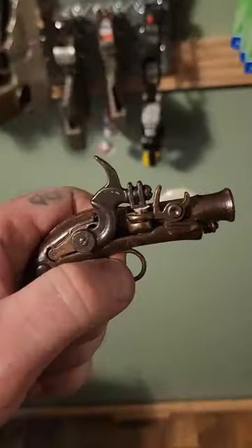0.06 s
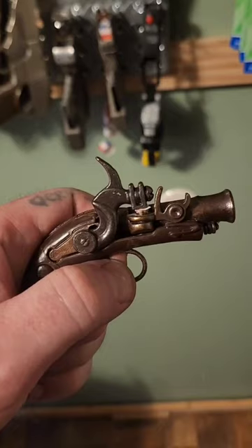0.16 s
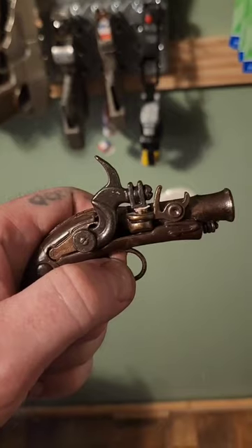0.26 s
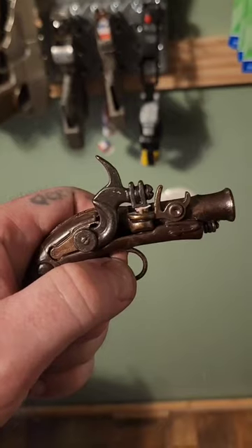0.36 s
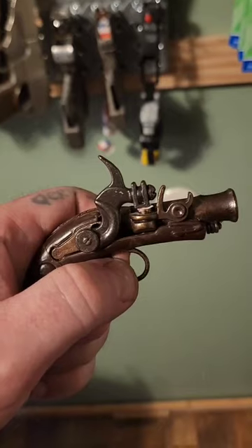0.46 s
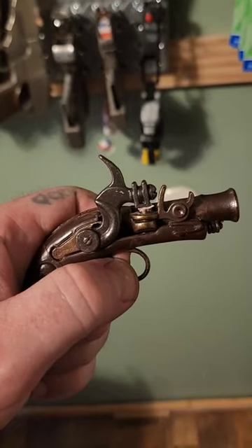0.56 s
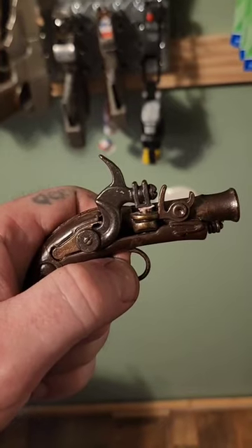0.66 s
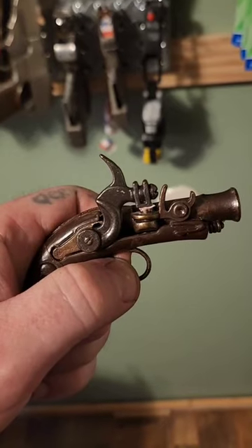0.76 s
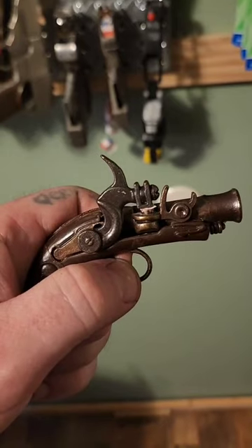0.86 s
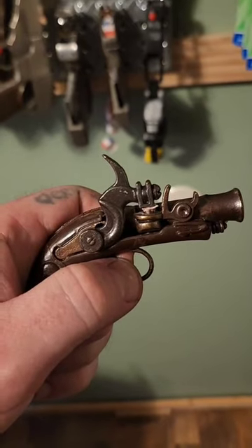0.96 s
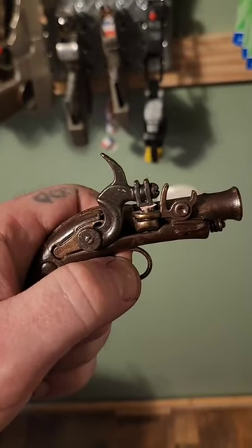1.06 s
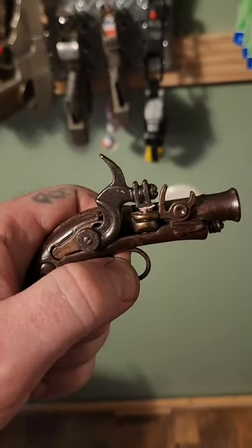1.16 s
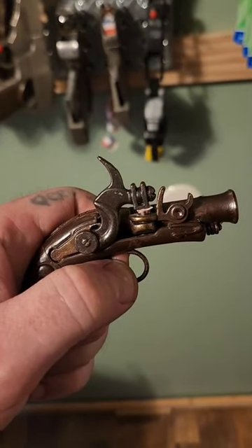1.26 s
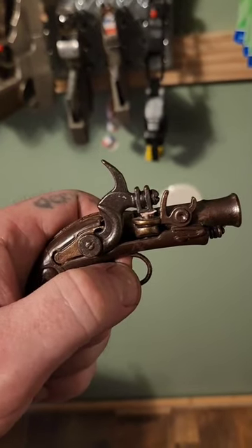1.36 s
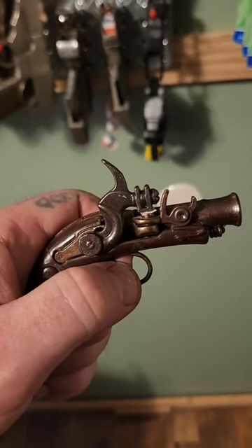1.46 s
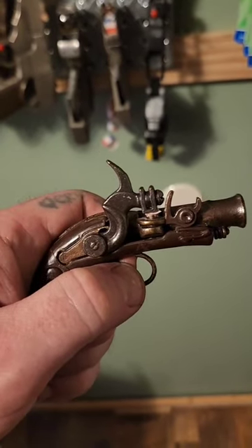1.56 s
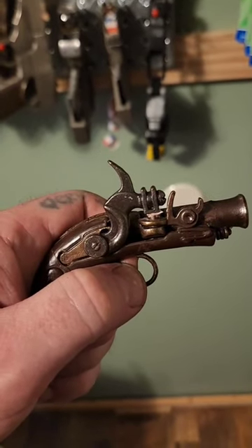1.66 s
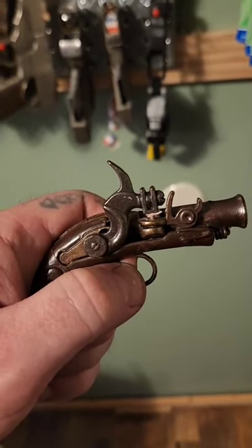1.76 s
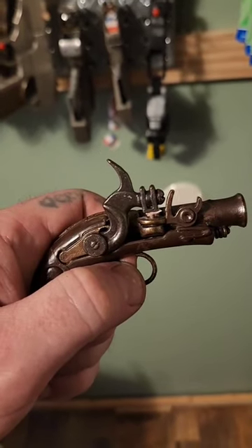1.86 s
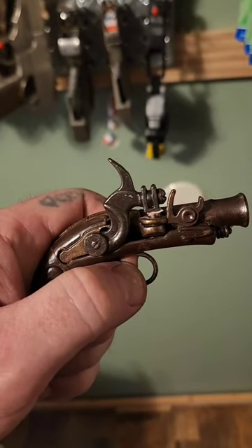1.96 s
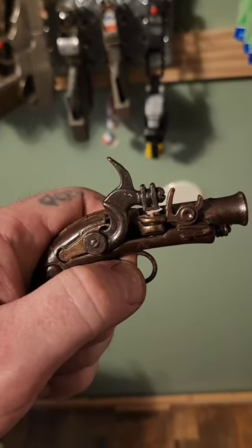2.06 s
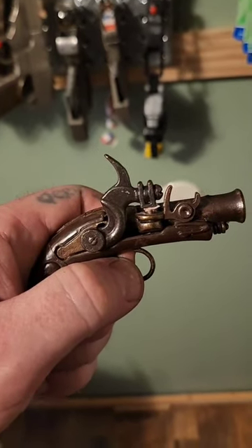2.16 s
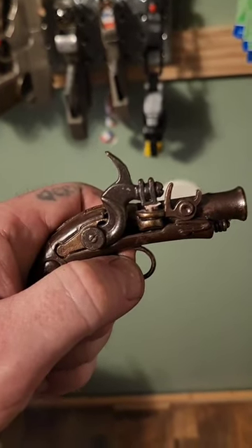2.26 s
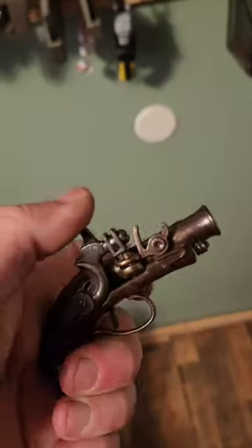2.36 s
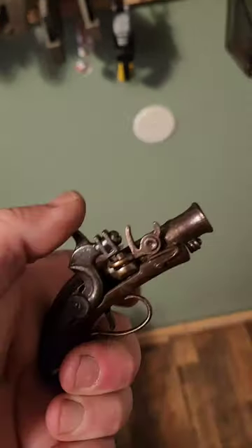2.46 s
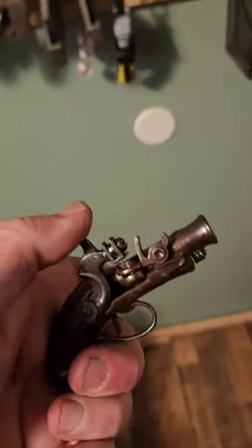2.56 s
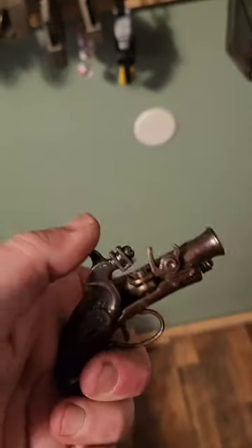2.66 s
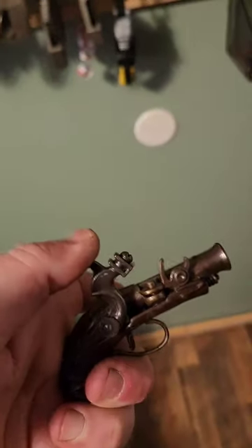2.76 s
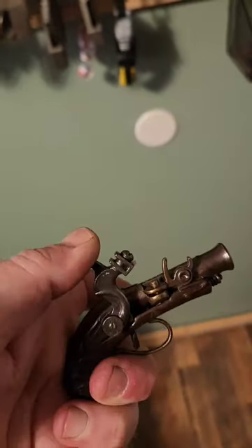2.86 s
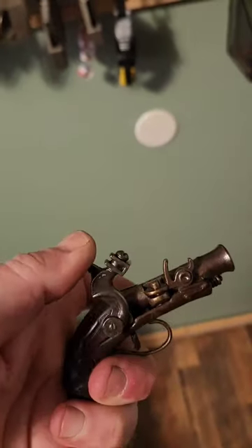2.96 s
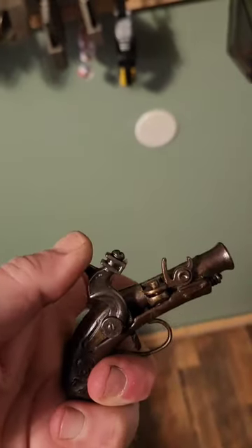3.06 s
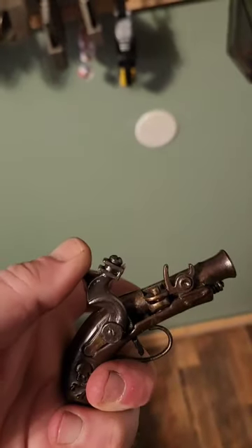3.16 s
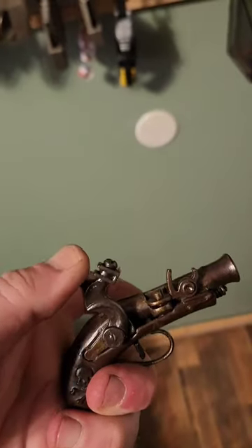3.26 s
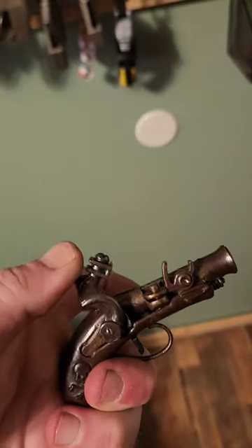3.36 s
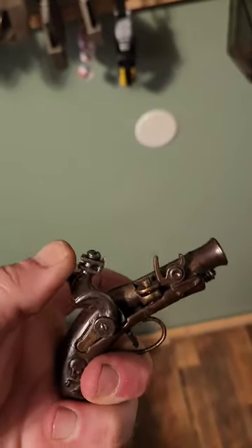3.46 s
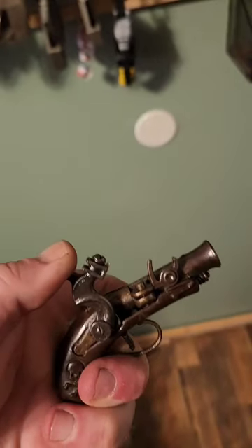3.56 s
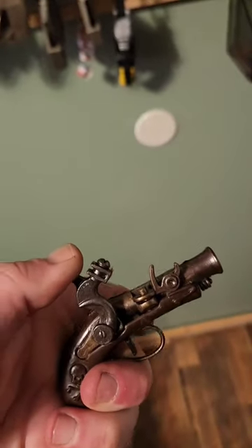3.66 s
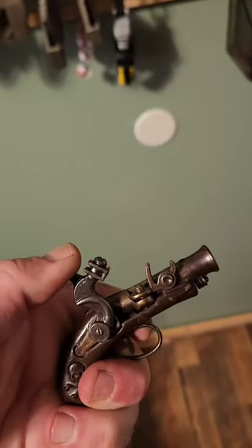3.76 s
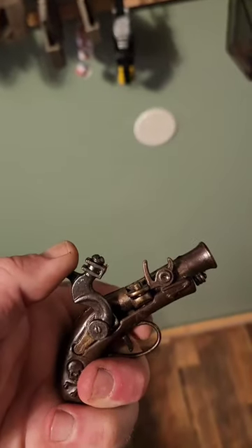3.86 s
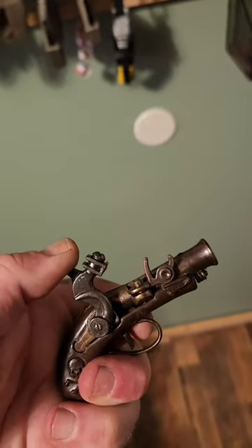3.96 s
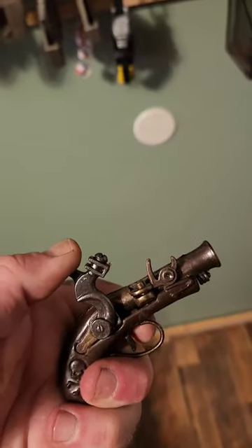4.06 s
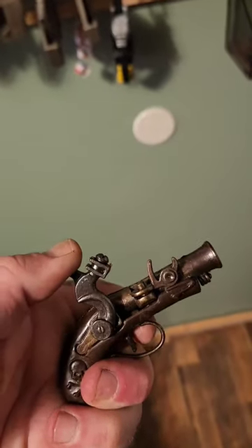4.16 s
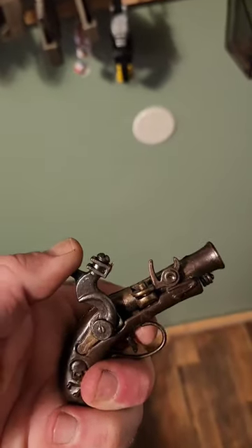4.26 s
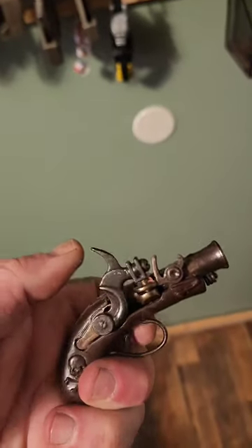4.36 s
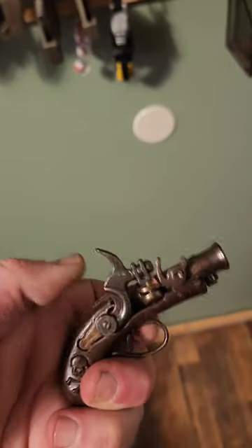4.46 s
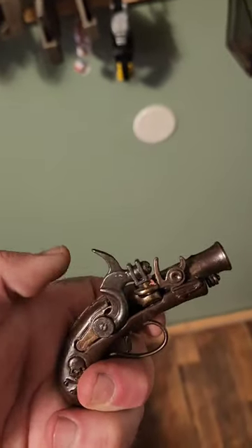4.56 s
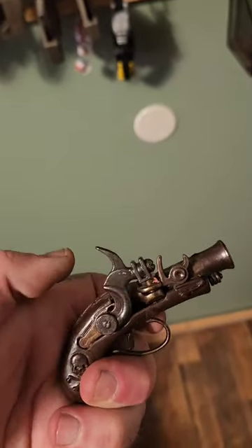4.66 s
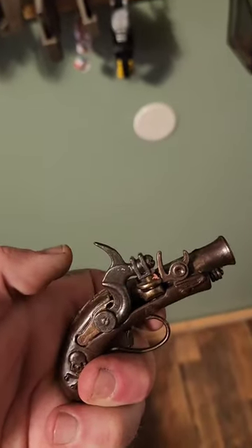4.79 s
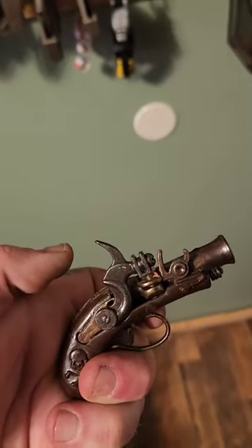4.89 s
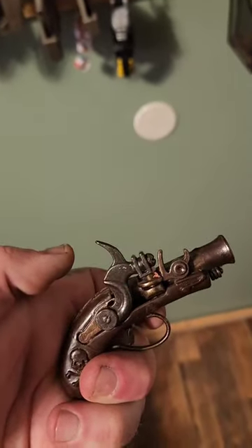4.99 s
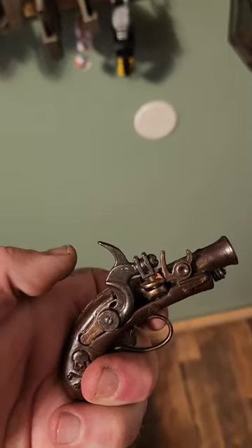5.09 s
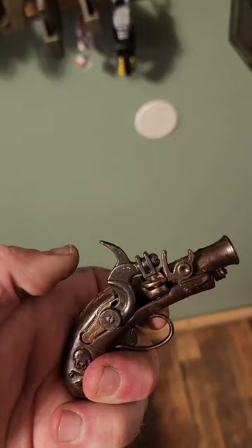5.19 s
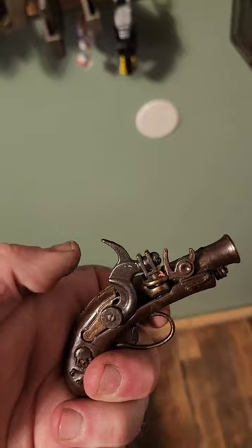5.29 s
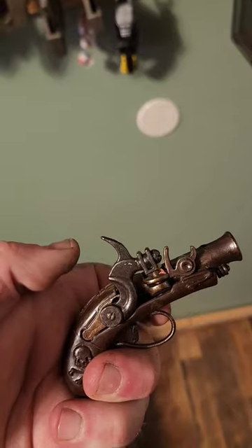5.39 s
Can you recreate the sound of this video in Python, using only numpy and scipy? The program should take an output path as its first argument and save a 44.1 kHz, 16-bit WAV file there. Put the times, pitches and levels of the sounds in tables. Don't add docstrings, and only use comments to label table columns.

```python
import sys
import numpy as np
from scipy import signal
from scipy.fft import rfft, irfft
from scipy.io import wavfile

SR = 44100
rng = np.random.default_rng(int(sys.argv[2]) if len(sys.argv) > 2 else 0)


def volts(x):
    e = np.asarray(x, float) / 20
    return 10 ** e


def digitize_waveform(pressure):
    field = np.atleast_2d(pressure).T
    bounded = np.clip(field, -1, 1)
    quanta = np.round(bounded * 32767).astype(np.int16)
    wavfile.write(sys.argv[1], SR, quanta)


N = 239440
TOP_HZ = 15650


def rms_one(x):
    return x / np.sqrt(np.mean(x ** 2) + 1e-20)


def cut(x, hz, kind, order):
    return signal.sosfilt(signal.butter(order, hz, kind, fs=SR, output="sos"), x)


def ramp(s, length):
    return np.clip((np.arange(N) / SR - s) / max(length, 1e-4), 0, 1)


def ring(x, hz, t60):
    r, w = volts(-60 / (t60 * SR)), 2 * np.pi * hz / SR
    return signal.lfilter([0, np.sin(w)], [1, -2 * r * np.cos(w), r * r], x + 1e-18)


def at_hz(points, hz, index=1):
    points = np.array(points)
    return np.interp(np.log(hz), np.log(points[:, 0]), points[:, index])


# (pitch [Hz], likeness [0 to 1])
LIKENESS = [(60, 0.99), (130, .7), (290, 0.37), (640, 0.07), (1400, 0.01)]


def coloured(spectrum, size, ripple_db, ripple_hz):
    hz = np.maximum(np.fft.rfftfreq(size, 1 / SR), 1)
    mid, side = rfft(rng.standard_normal((2, size)))
    alike = np.clip(at_hz(LIKENESS, hz), 0, 1)
    lines = np.sqrt(1 + alike) * mid + np.sqrt(1 - alike) * side * [[1], [-1]]
    colour_db = [at_hz(spectrum, hz, index=1), at_hz(spectrum, hz, index=2)]
    lines = lines * volts(colour_db) * (hz > 15) * (hz < TOP_HZ)
    knots = rng.standard_normal((2, 400))
    lines = lines * volts([ripple_db * np.interp(hz / ripple_hz, np.arange(400), k) for k in knots])
    return hz, lines / np.std(irfft(lines.mean(axis=0), size))


# (start [s], end [s],
# rumble [dB], hiss [dB], creep of the hiss [dB])
HIGH_STRETCHES = [
    (0, .2075, -68.5, -69.5, 10),
    (.262, 2.596, -65.5, -77, 8),
    (4.595, 5.43, -67, -74, 2),
]
LOW_STRETCHES = [
    (2.651, 4.52, -57, -64.5, -7.5),
]


def stretch_levels(stretches):
    t = np.arange(N) / SR
    start, end, rumble_db, hiss_db, creep_db = np.transpose(stretches)[:, :, None]
    away = np.maximum(np.maximum(start - t, t - end), 0)
    near = away.argmin(axis=0)
    creep_s, rumble_follows = 0.95, 0.18
    creep = np.choose(near, creep_db * (1 - np.exp(-np.maximum(t - start, 0) / creep_s)))
    away = away.min(axis=0)
    step_db, step_s, slide_db_per_s = -21, .003, -450
    gate = np.maximum(step_db * np.minimum(away / step_s, 1) + slide_db_per_s * away, -100)
    return gate, (rumble_db[near, 0] + rumble_follows * creep, hiss_db[near, 0] + creep)


# (pitch [Hz], left level [dB per Hz], right level [dB per Hz])
TONE_HIGH = [(21.5, -11, -10.5), (44, -1, -2.5), (65.5, 1.5, 1), (110, -20, -16), (246, -23, -19),
             (500, -20.5, -21), (1305, -30, -20), (3180, -37.5, -26.5), (5600, -42, -30),
             (7500, -38.5, -40), (9500, -44, -45.5), (12500, -38.5, -33), (14500, -38.5, -38.5),
             (15700, -45.5, -43.5)]
TONE_LOW = [(22, -9, -10), (45, 2, 2), (69, -3.5, -3.5), (122, -20, -24.5), (201, -17.5, -18.5),
            (324, -26, -28), (450, -22, -19), (970, -26.5, -32.5), (2530, -33.5, -34), (4940, -40, -44),
            (7500, -42.5, -49.5), (9300, -52, -52), (12700, -40, -57.5), (15700, -52, -62)]
# (pitch [Hz], width [Hz], level over the room sound [dB])
HUMS = [(60, 12, 3.5), (158.6, 8.3, 3.5), (226, 21, 6.5), (392, 33, 5.5), (445.4, 22, 4.5), (503, 18, 9.5),
        (743, 16, 3.5)]


def room_tone(spectrum, levels, split_hz):
    hz, lines = coloured(spectrum, N, ripple_db=1.5, ripple_hz=60.6)
    for hum_hz, width_hz, db in HUMS:
        lines = lines * (1 + (volts(db) - 1) / (1 + (2 * (hz - hum_hz) / width_hz) ** 2))
    low_share = 1 / (1 + (hz / split_hz) ** 4)
    out = 0
    for db, share in zip(levels, (low_share, 1 - low_share)):
        part = irfft(lines * np.sqrt(share), N)
        out = out + volts(db) * part / np.std(part.mean(axis=0))
    return out


# (time [s], hammer level [dB], sear over hammer [dB], left minus right [dB])
CLICKS = [(0.181, -63, 0.5, -12), (2.65, -52, -1, -10), (2.6597, -50, -3.5, -14.5), (2.6741, -47, -5.5, -8),
          (2.6819, -51, 1.5, -8), (2.6927, -54, -10, -7), (2.7054, -54, -7, -7), (2.7167, -53.5, -15, -16),
          (2.7408, -61, 4, 6), (2.7549, -47.5, 2, -8), (2.801, -42.5, -6.5, -6), (2.8141, -44.5, 0.3, -5),
          (2.8529, -63, -3, -11), (2.862, -58, -2.5, -2), (2.8814, -66, -1, 3), (2.8894, -64, -2.5, -4),
          (3.1674, -67, -13, 4.5), (3.7402, -49.5, 3.5, -2), (3.7816, -53.5, -11.5, -13)]
# (time [s], hammer level [dB], sear over hammer [dB], spring over hammer [dB], rattle [s])
LATCH = [
    (3.11, -27.5, -2.5, -13, 0.00022),
    (3.128, -56, 5.5, 4.5, .0006),
    (3.2821, -38.5, -3.5, -3, 0.00086),
    (3.293, -60, 8.5, 5, 0.00089),
    (3.8369, -41, -3.5, -18, 0.00058),
]
# (pitch [Hz], level [dB], time to fade 60 dB [s])
LOCK_MODES = [
    [(2200, -7, .004), (2650, -1, 0.007), (3050, 3, 0.0065), (3500, 1, 0.0053), (3943, -4, 0.0019)],
    [(5450, -0.5, .004), (6390, 1.5, .006), (7500, -10, .003), (8500, -15, .003), (9400, -12, .004)],
    [(10200, -6, .003), (11850, -0.5, 0.0031), (12900, -3, .003), (14400, -4, .003)],
]
# (start time [s], length [s], pitch [Hz], level [dB])
RUBS = [(2.716, 0.012, 3700, -54), (2.716, 0.007, 3120, -58), (2.717, 0.017, 6770, -58),
        (2.717, .008, 5100, -64), (2.808, 0.004, 3500, -57.5), (3.128, 0.02, 2634, -64.5),
        (3.277, 0.0055, 7500, -62), (3.282, 0.014, 9130, -59), (3.283, .02, 11500, -63),
        (3.284, .012, 10600, -62), (3.743, 0.0047, 6500, -57), (3.745, 0.055, 6510, -73),
        (3.837, 0.0086, 9300, -65.5), (3.923, 0.025, 6130, -70), (3.924, 0.032, 7040, -76)]


def lock():
    # spring 17 dB under the sear, 0.6 ms rattle; a latch leans to the right
    contacts = [(s, db, sear_db, sear_db - 17, .0006, lean_db) for s, db, sear_db, lean_db in CLICKS]
    contacts += [(*row, -2.5) for row in LATCH]
    rattles = rng.standard_normal((len(contacts), 2, 400))
    echoes = rng.standard_normal((len(contacts), 2, 6000))
    t, out = np.arange(6000) / SR, np.zeros((2, N))
    table_and_wall = volts(-31.0) * np.exp(-t / 0.01)
    whole_room = volts(-41.5) * np.exp(-t / 0.043)
    dying = (table_and_wall + whole_room) * (t > .002)
    for (s, db, sear_db, spring_db, length, lean_db), rattle, echo in zip(contacts, rattles, echoes):
        age = t[:400] / max(length, 1e-4)
        push = np.pad((rattle[0] + rattle) * age * np.exp(-age), ((0, 0), (0, 1100)))
        direct = 0
        for modes, part_db in zip(LOCK_MODES, (0, sear_db, spring_db)):
            body = 0
            for k, (hz, mode_db, t60) in enumerate(modes):
                tone = rms_one(ring(ring(push, hz, t60), hz, 0.0018))
                body = body + (-1) ** k * volts(mode_db) * tone
            direct = direct + body / np.abs(body).max() * volts(db + part_db + 3.0)
        answer = cut(np.diff(echo * dying, axis=1), 4000, "high", order=1)
        wet = signal.fftconvolve(direct, answer, axes=1)
        at = round(s * SR)
        out[:, at:at + 1500] += direct * volts(np.array([[.5], [-.5]]) * lean_db)
        out[:, at:at + wet.shape[1]] += wet
    for s, length, hz, db in RUBS:
        shape = (1 - np.exp(-t / .0008)) * np.exp(-(t / length) ** 3)
        scrape = ring(ring(rng.standard_normal((2, 6000)), hz, 0.01), hz, 0.0034)
        at = round(s * SR)
        out[:, at:at + 6000] += volts(db) * rms_one(scrape) * shape
    out = signal.lfilter(*signal.iirnotch(4550, 13, fs=SR), out)
    return cut(out, 2000, "high", order=8)


def smear_level():
    peak_s = 4.5165
    t = np.arange(N) / SR - peak_s
    peak_db, swell_db_per_s = np.c_[[-11, -19.5]], np.c_[[1450, 750.5]]
    drop_db, fall_db_per_s = np.c_[[-17, -11]], np.c_[[-1300, -900]]
    db = peak_db + np.where(t < 0, swell_db_per_s * t, fall_db_per_s * t) + drop_db * ramp(peak_s, 0.0048)
    return volts(db) * ramp(4.487, .003)


# (pitch [Hz], left level [dB], right level [dB])
SMEAR = [(375, -14.5, -2), (645, -18, -4.5), (1000, -10, -11), (2380, -3.5, -17.5), (3700, -14.5, -5.5),
         (5100, -14, 2.5), (6900, -6, -8), (7430, -6.5, -1.5), (8360, -14, -8), (9050, -1, -19.5),
         (9750, -1.5, -14), (10850, -4, -16), (11450, -6.5, -10), (14600, -10.5, -18)]


def smear():
    size = 16384
    white = rng.standard_normal((2, size))
    lines = 0
    for hz, left_db, right_db in SMEAR:
        tone = rms_one(ring(ring(white, hz, 0.019), hz, 0.0066))
        lines = lines + tone * volts([[left_db], [right_db]])
    at = round(4.3 * SR)
    before = at + np.arange(size) < SHOTS[1][0] * SR
    hiss = volts(-8) * cut(white[::-1], TOP_HZ, "low", order=12) * before
    out = np.zeros((2, N))
    out[:, at:at + size] = lines / lines.std(axis=1, keepdims=True) + hiss
    return out * smear_level()


# (time [s], pitch [Hz], right level [dB], fall [cycles])
PUFFS = [(.2625, 179, -25, .7), (4.493, 150, -33, .9), (4.5058, 230, -14, .8), (4.515, 160, -2, .48),
         (4.516, 90, -11.5, .41), (4.5207, 330, -10, .5), (4.535, 170, -30.5, 2.1)]
# (time [s], pitch [Hz], right level [dB], rise [cycles], fall [cycles])
SWINGS = [
    (.296, 23.2, -28, 0.35, 0.61),
    (4.527, 23.7, -18, 0.091, 0.89),
    (4.6, 102.4, -39.5, 4.4, 6.2),
]
# (time [s], pitch [Hz], right level [dB])
DRONE_SWELLS = [(3.93, 495.5, -65.5), (4.24, 527.7, -67)]
# (time [s], height [full scale = 1])
SPIKES = [(0.2634, 0.58), (.2685, -0.34), (0.273, -0.36), (0.2757, -0.055), (.2783, -.25), (0.282, -0.22)]


def overload():
    out, t = np.zeros((2, N)), np.arange(N) / SR
    swings = [(s, hz, db, .7, fall, -15) for s, hz, db, fall in PUFFS]
    swings += [(*row, -8) for row in SWINGS]
    swings += [(*row, 31, 31, 3) for row in DRONE_SWELLS]
    for s, hz, db, rise, fall, lean_db in swings:
        cycles = hz * (t - s)
        shape = np.exp(-np.where(t < s, (cycles / rise) ** 2, cycles / fall))
        out += shape * np.sin(2 * np.pi * cycles) * volts([[db + lean_db], [db]])
    for s, height in SPIKES:
        out[1] += height * np.exp(-((t - s) / 0.000075) ** 2)
    return cut(out * ramp(SHOTS[0][0] - .002, .002), 16, "high", order=1)


# (time [s], attack [s], hold [s], release [s], depth [dB])
LEFT_DIPS = [
    (.235, .054, .004, .013, -10),
    (4.506, .028, .047, .022, -14.5),
    (4.543, .018, .015, .012, -25),
]
RIGHT_DIPS = [
    (.25, .005, 0.032, 0.033, -18.5),
    (4.5222, 0.0079, 0.062, 0.014, -50.5),
    (4.528, 0.024, 0.035, .04, -14),
]


def ducking():
    highs = np.zeros((2, N))
    for side, dips in enumerate((LEFT_DIPS, RIGHT_DIPS)):
        for s, attack, hold, release, db in dips:
            highs[side] += db * (ramp(s, attack) - ramp(s + attack + hold, release))
    lows_db_at_40, lows_curve = np.c_[[-17, -17]], np.c_[[1.3, 1.7]]
    lows = lows_db_at_40 * (np.abs(highs) / 40) ** lows_curve
    return volts(-3 + np.vstack([highs, lows]))


# (pitch [Hz], left level [dB per Hz], right level [dB per Hz])
BLAST = [(30, -8.5, -12), (76.5, -11.5, -10.5), (175, -22.5, -38), (496, -14, -15.5), (1109, -15.5, -20),
         (2130, -11, -12.5), (3997, -5.5, -9.5), (5570, -4, -3), (7700, -2, -4), (8500, -4.5, -11.5),
         (10000, -6.5, -13.5), (13200, -4, -8.5), (15400, -7, -11.5), (15300, -12.5, -17)]
# (pitch [Hz], time to fade 60 dB [s])
ROOM_T60 = [(40, .3), (200, .25), (700, 0.23), (1800, 0.24), (3000, 0.26), (4500, .22), (7500, 0.28),
            (10000, .24), (12500, .21), (16000, 0.2)]


def room_answer(size, lasting):
    hz, lines = coloured(BLAST, size, ripple_db=2.5, ripple_hz=90.3)
    t, out = np.arange(size) / SR, 0
    for centre in 22 * 2 ** np.arange(0, 10, .5):
        share = np.clip(1 - 2 * np.abs(np.log2(hz / centre)), 0, 1)
        out = out + irfft(lines * share, size) * volts(-60 * t / lasting / at_hz(ROOM_T60, centre))
    return out


# (time [s], blast level [dB], crack level [dB], sizzle level [dB], extra share of mids [1])
SHOTS = [
    (.2621, -9, -3.5, -22, .4),
    (4.5202, 0, 2, -5.5, -.25),
]


def caps():
    out, size = np.zeros((2, N)), 32768
    t = np.arange(size) / SR
    for s, blast_db, crack_db, sizzle_db, mids in SHOTS:
        crack = cut(rng.standard_normal((2, size)) * np.exp(-t / 0.0024), TOP_HZ, "low", order=12)
        sizzle = cut(rng.standard_normal((2, size)), [11000, TOP_HZ], "band", order=4)
        tail = room_answer(size, lasting=1.016)
        tail = tail + mids * signal.lfilter(*signal.iirpeak(3700, 1.3, fs=SR), tail)
        at = round(s * SR)
        out[:, at:at + size] += volts(blast_db) * tail + volts(crack_db) * crack
        out[:, at:at + size] += volts(sizzle_db) * sizzle * np.exp(-t / .016)
    duck, split_hz = ducking(), 2000
    highs = cut(out, split_hz, "high", order=3) * duck[:2]
    lows = cut(out, split_hz, "low", order=3) * duck[2:]
    return highs + lows


def scene():
    high_db, high_levels = stretch_levels(HIGH_STRETCHES)
    low_db, low_levels = stretch_levels(LOW_STRETCHES)
    high = volts(high_db) * room_tone(TONE_HIGH, high_levels, split_hz=150)
    low = volts(low_db) * room_tone(TONE_LOW, low_levels, split_hz=220)
    shots = caps() + overload() + smear()
    return high + low + shots + volts(np.maximum(high_db, low_db)) * lock()


def top_cut(x):
    return signal.sosfilt(signal.butter(12, 16800, fs=SR, output="sos"), x)


def record(dry):
    mix = 0.93 * np.tanh(dry / 1.065)
    return top_cut(mix)


dry = scene()
out = record(dry)
digitize_waveform(out)
```